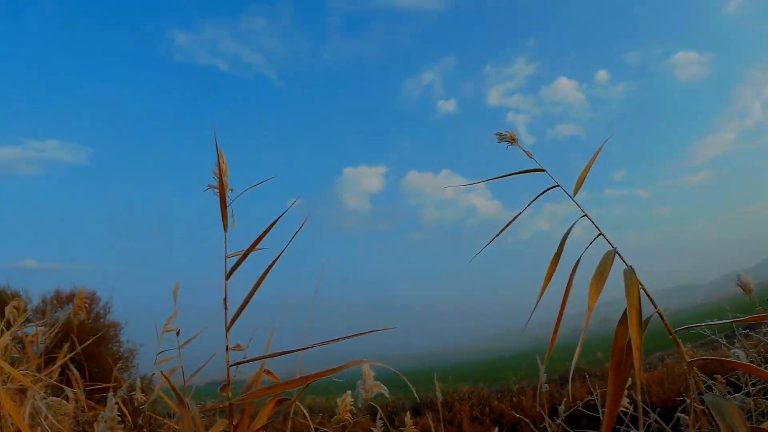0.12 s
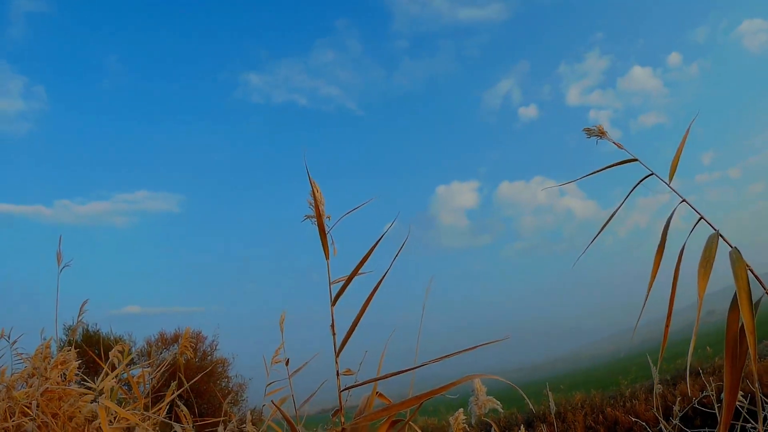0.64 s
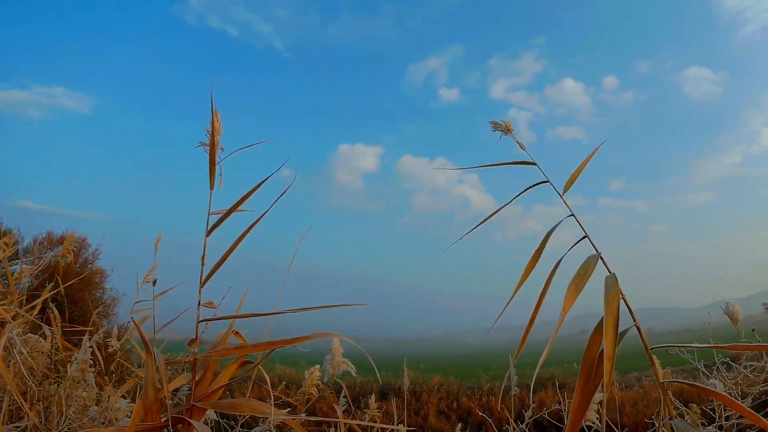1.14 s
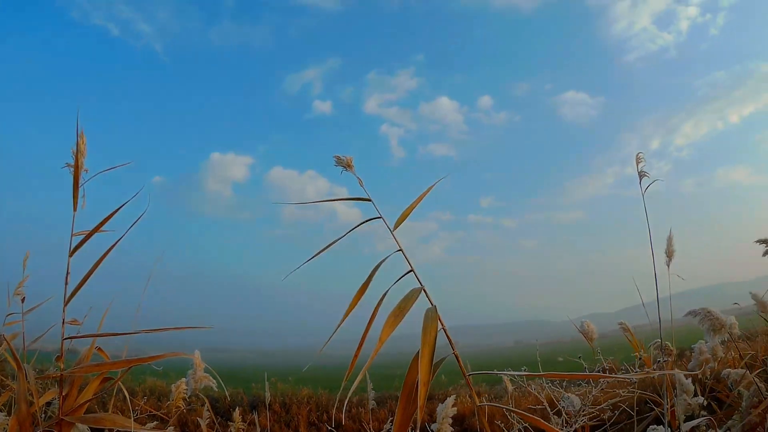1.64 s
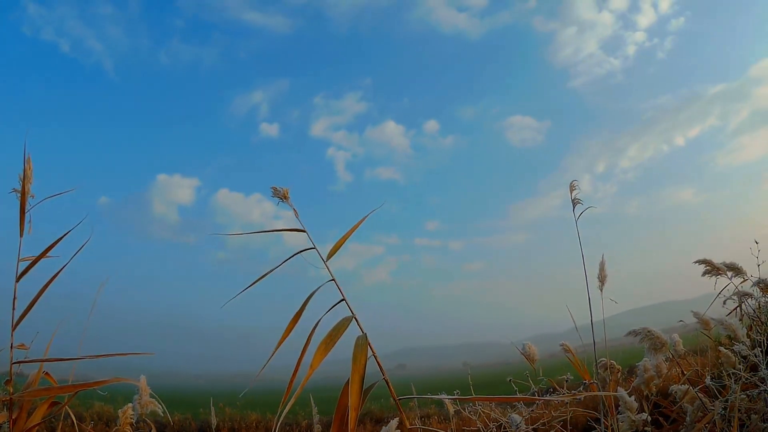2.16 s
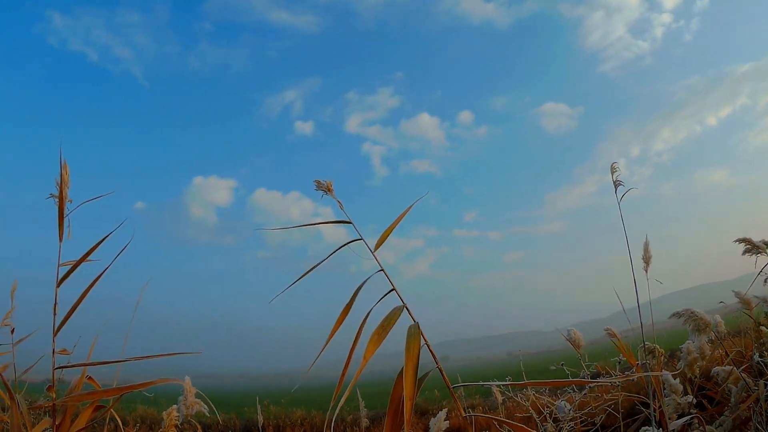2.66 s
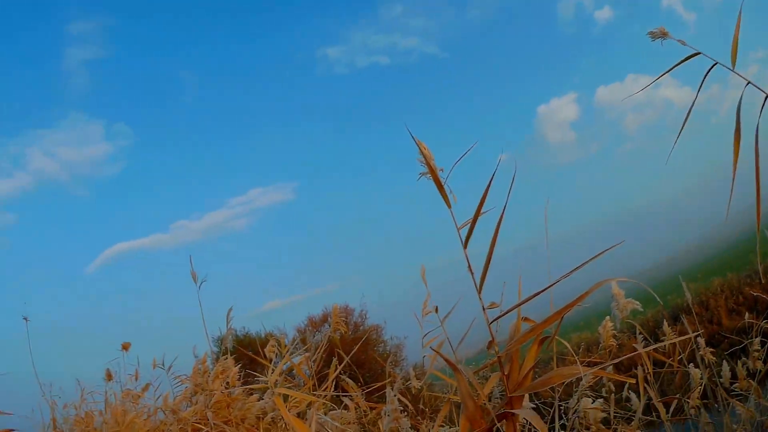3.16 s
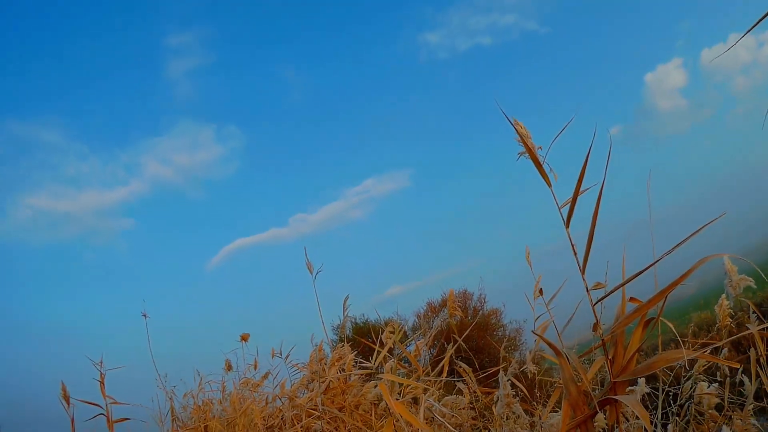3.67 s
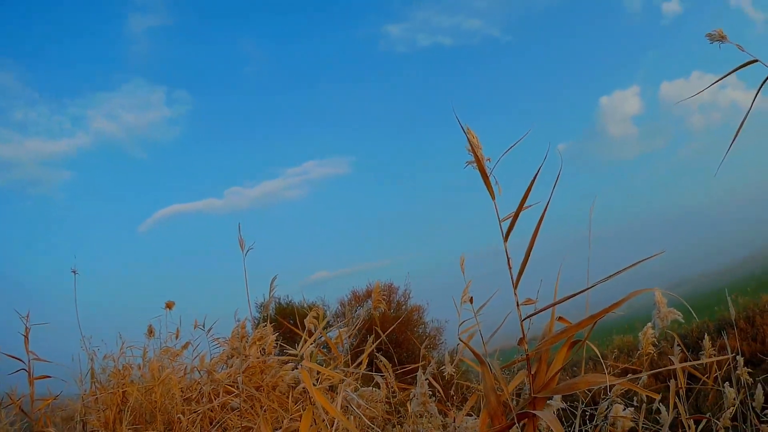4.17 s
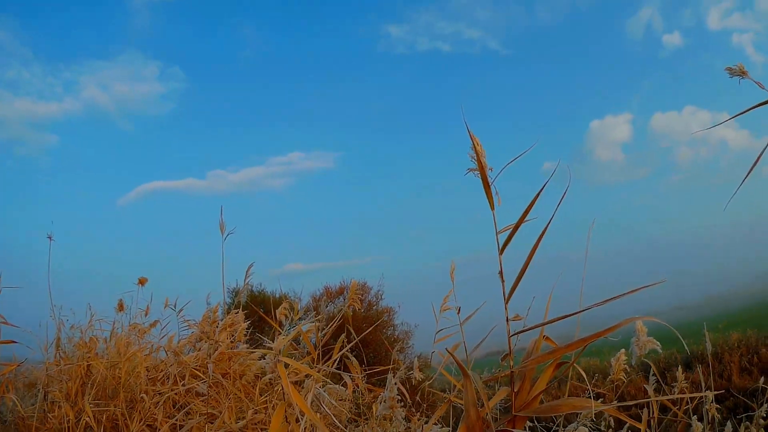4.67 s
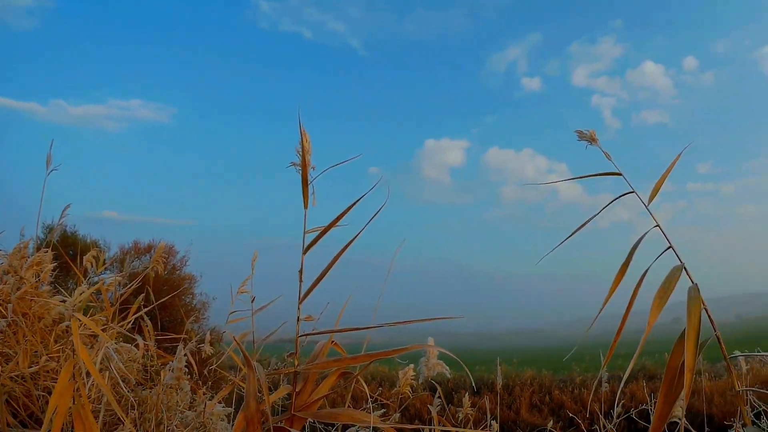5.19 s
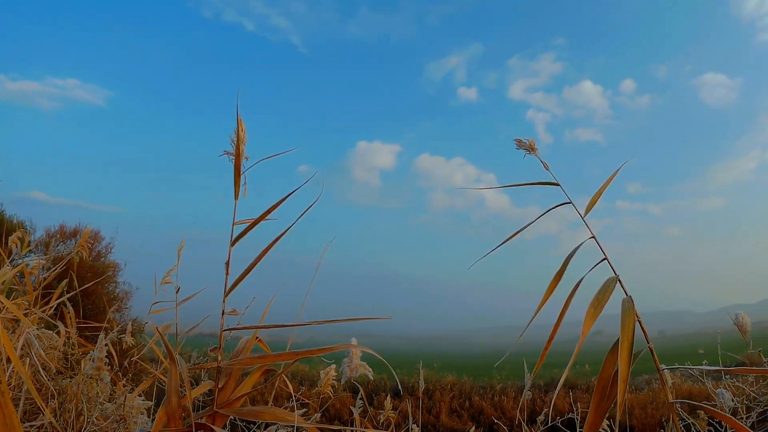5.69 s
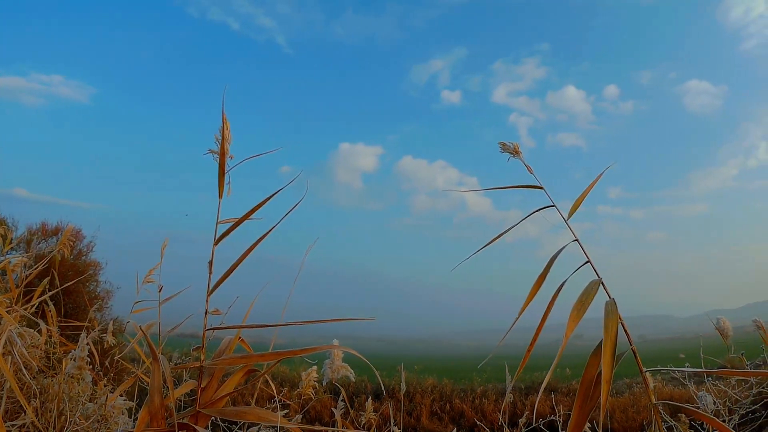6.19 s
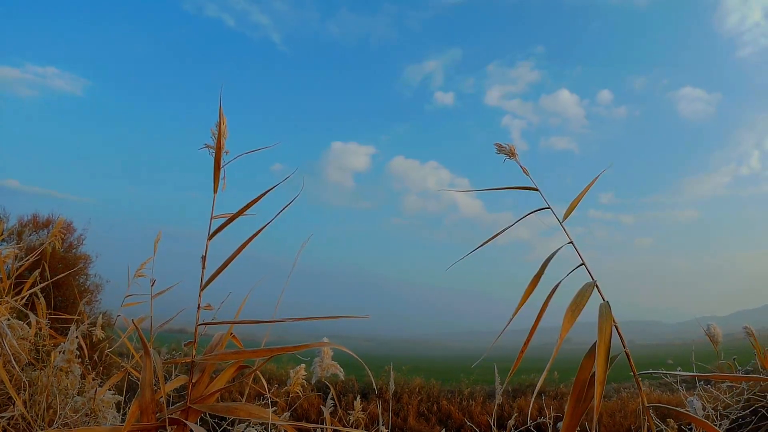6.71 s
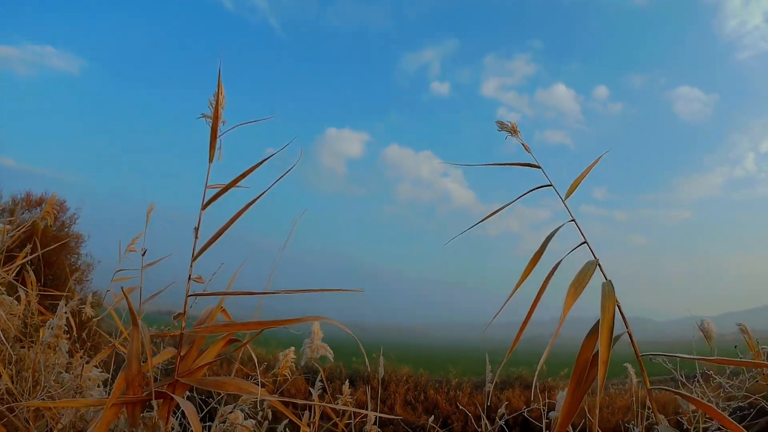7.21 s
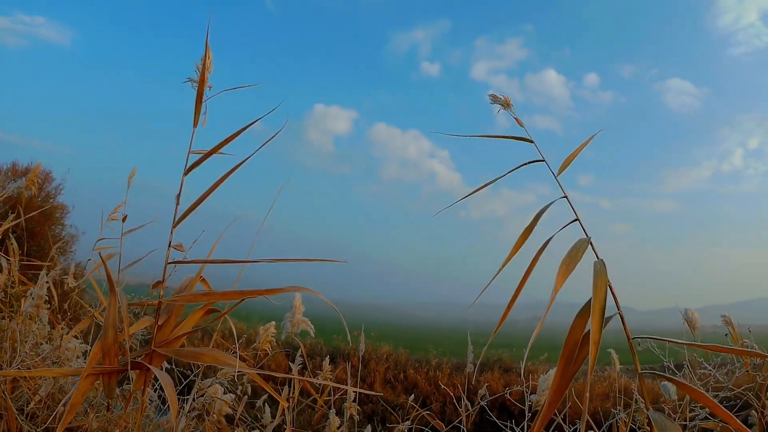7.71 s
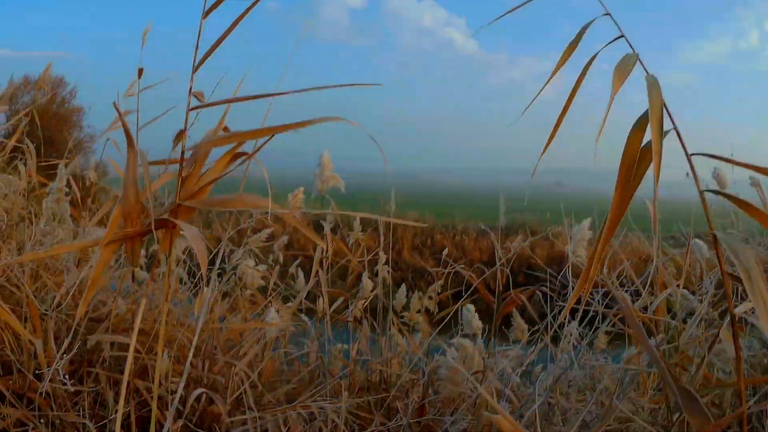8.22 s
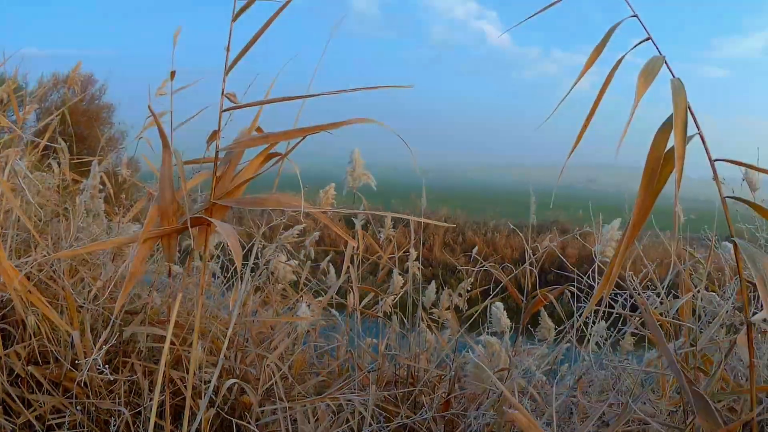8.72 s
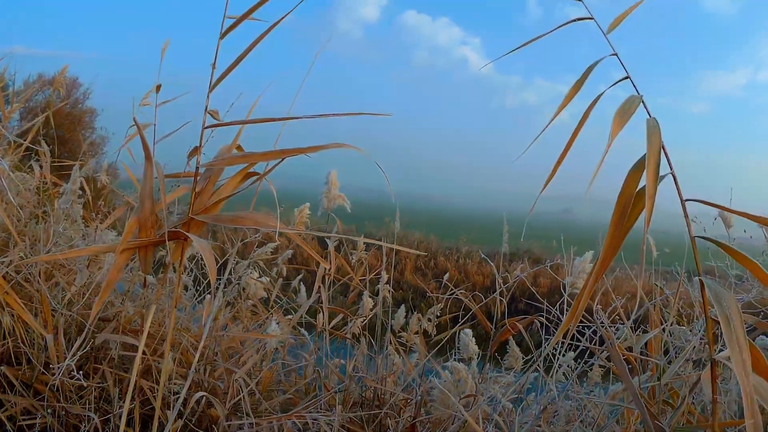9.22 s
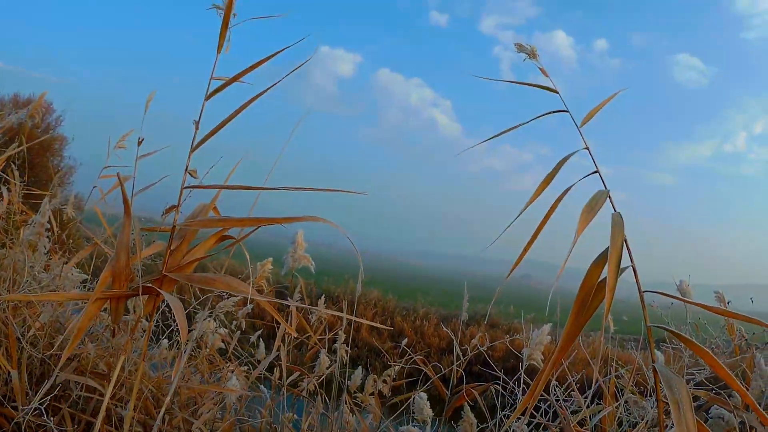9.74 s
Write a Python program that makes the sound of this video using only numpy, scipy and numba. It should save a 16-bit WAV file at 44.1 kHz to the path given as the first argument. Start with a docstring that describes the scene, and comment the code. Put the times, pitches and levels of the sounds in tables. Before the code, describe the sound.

Quiet country hiss and a thin high electronic whine lie under a loud duck call blown at close range. Buzzing, quack-like notes start long and even, then shorten and come faster with a rougher rasp. Later the reed stutters in quick muffled bursts, growls once from low to higher, and chatters again at the end. Faint handling knocks tick beside the small camera, which squashes the loudest notes. Open air, little reverberation.

```python
"""A reed duck call blown close to a small camera in an open field: a clipped opener, a run of
quacks that shorten, tongued chatter, one low growl and more chatter. Each slap of the reed is a
click that rings the barrel and the cupped hand. Small knocks and ticks sound near the camera, over
quiet country hiss and a thin whine. Loud notes overload the camera, whose gain ducks and recovers."""
import sys
import numpy as np
from scipy import signal
from scipy.fft import rfft, irfft
from scipy.io import wavfile
from scipy.ndimage import uniform_filter1d
from numba import njit

SR = 44100
rng = np.random.default_rng(int(sys.argv[2]) if len(sys.argv) > 2 else 0)


def voltage_ratio(level):
    """Linear amplitude factor for a level in decibels (scalar or array-like)."""
    return 10 ** (np.asarray(level, float) / 20)


def wav_record(signal):
    """Record a signal, one row per channel, as 16-bit PCM in the file named by sys.argv[1]."""
    frames = np.transpose(np.atleast_2d(signal))
    bounded = np.clip(frames, -1, 1)
    # unit amplitude maps onto the largest positive 16-bit level
    quanta = np.round(bounded * 32767).astype(np.int16)
    wavfile.write(sys.argv[1], SR, quanta)


N = 434826


def quacks():
    """Opener, quacks and growl: each slap of the reed is a click that rings the barrel and hand."""
    # The quacks of the run. Each row: start in seconds, length in seconds, reed rate in Hz as the
    # hold begins, relative level in dB then, roughness from 0 to 1.
    quack_rows = [(1.339, .36, 374, 5, .06), (1.905, .311, 371.5, 5.5, 0.06),
                  (2.421, 0.22, 363.9, 5.5, 0.06), (2.862, 0.18, 372.8, 6, 0.04),
                  (3.226, 0.17, 353.8, 7, .16), (3.579, 0.16, 295, 6.5, 0.19),
                  (3.917, 0.14, 301, 4.5, 0.19), (4.253, .12, 257.3, 5.5, 0.2)]
    # Two notes with their own shape, the clipped opener and the low growl. Each row: time in seconds,
    # reed rate in Hz, relative level in dB, roughness from 0 to 1, relative hand ring in dB.
    opener = [(1.13, 163, 4.5, 0.11, -15.5), (1.141, 192.6, 8, 0.07, -8.5), (1.152, 206, -3, 0.11, -8.5),
              (1.163, 202, -7.5, 0.05, -4)]
    growl_rows = [(7.495, 114.7, -34, .01, 10.5), (7.536, 129.5, -14.5, 0.013, 5.5),
                  (7.579, 152.2, -4, 0.01, -3), (7.624, 162.9, -2, 0.0046, -0.5),
                  (7.662, 165.9, 6, .012, -2.5), (7.68, 195.2, 0, 0.13, 4), (7.7, 233.6, 0, .08, -9.5),
                  (7.711, 228, -7, .05, 5)]

    barrel_hz, wander_hz, wander_s = 1590, 45, 0.01
    barrel_hz_per_roughness = 599.6
    step = int(wander_s * SR)
    wander = np.repeat(rng.standard_normal(N // step + 1), step)
    barrel_hz = barrel_hz + wander_hz * uniform_filter1d(wander, step)[:N]

    slaps, hand_db, keep = np.zeros(N), np.zeros(N), np.ones(N)
    for rows in [opener, growl_rows] + [quack_curve(*row) for row in quack_rows]:
        s, hz, db, roughness, ring_db = np.transpose(rows)
        start = int(s[0] * SR)
        t = np.arange(s[0], s[-1], 1 / SR)
        # the note and a short tail after it
        span = np.arange(start, start + len(t) + 2000)
        barrel_hz[span] += barrel_hz_per_roughness * roughness.max()
        at, beat, rate, rough = slap_times(t, s, hz, roughness, barrel_hz[start:][:len(t)])
        level_db = np.interp(at, s, db) + 2 * rough * rng.standard_normal(len(beat))
        # a faster reed slaps more softly
        size = voltage_ratio(level_db) / np.sqrt(rate / 380)
        # the first beats barely shut the reed
        add_clicks(slaps, at, 0.5 * size * voltage_ratio(-6 * 0.39 ** beat))
        # the reed swings wide open just before it shuts and lets the ring out
        keep[(at * SR).astype(int)[:, None] - np.arange(14, 34)] = 0.93
        hand_db[span] = np.interp(span / SR, s, ring_db)

    drive = with_air(slaps, air_db=-27)
    growl = np.arange(N) > 7 * SR  # from 7 s on, this function plays only the growl
    barrel = ring(pushed(drive, share=1.0), barrel_hz, 260.0, keep)
    out = -open_hand(pushed(drive, share=0.23), growl, hand_db) - barrel
    # a side cavity of the open hand swallows part of one band
    dip_hz, dip_width_hz, dip_depth = 2840, 340, 0.52
    dip = signal.lfilter(*signal.iirpeak(dip_hz, dip_hz / dip_width_hz, fs=SR), out)
    # the open hand radiates little bass
    thin = signal.sosfilt(signal.butter(2, 330, "high", fs=SR, output="sos"), out)
    return np.where(growl, out - growl_chamber(drive * growl), thin - dip_depth * dip)


def quack_curve(s, length_s, hz, db, rough):
    """A quack starts as all do, creeps up while held, then drops quickly in pitch and level."""
    # The shared start. Each row: seconds after the start, reed rate in Hz, level in dB relative to
    # the hold, roughness from 0 to 1, relative hand ring in dB.
    onset = [(0, 142.3, -21.5, 0.1, 3), (.02, 204.5, -6.5, .07, 0), (.055, 270, 2, .05, -6.5)]
    held_after_s, swell_db, creep = 0.09, 2.5, 0.024  # creep is a share of the rate
    release_s, release_db, release_sag = 0.018, -15.5, 0.46  # sag is a share of the rate
    # a rougher reed rings the hand more
    hand_db = -9.5 + 61.5 * rough
    end = s + length_s
    start_rows = [(s + t, f, db + under_db, r, ring_db) for t, f, under_db, r, ring_db in onset]
    return start_rows + [
        (s + held_after_s, hz, db, rough, hand_db),
        (end - release_s, hz * (1 + creep), db + swell_db, rough, hand_db),
        (end, hz * (1 - release_sag), db + release_db, rough, 4)]


def slap_times(t, s, hz, roughness, barrel_hz):
    """Reed beats follow the rate curve; a rough reed limps, jitters and locks to the barrel: a rasp."""
    phase = np.cumsum(np.interp(t, s, hz)) / SR
    beat = np.arange(int(phase[-1]) + 1)
    jitter, choice = rng.standard_normal((2, len(beat)))
    at = np.interp(beat, phase, t)
    rate, rough = np.interp(at, s, hz), np.interp(at, s, roughness)
    # past this roughness the beats pair up long-short
    limp_from = 0.065
    at = at + 0.7 * np.maximum(rough - limp_from, 0) * (-1.0) ** beat / rate
    # a hard-blown reed shuts in step with the barrel's ring: gaps of four or five rings limp
    rings = np.cumsum(barrel_hz) / SR
    chosen = np.interp(at, t, rings) + 3.2 * np.minimum(rough, limp_from) * choice
    in_step = np.interp(np.round(chosen), rings, t)
    pull = np.clip(18 * rough - 0.15, 0, 0.75)
    at = at + pull * (in_step - at)
    at = at + np.minimum(rough, 1.62 * limp_from) * 0.36 * jitter / rate
    return at, beat, rate, rough


def open_hand(drive, growl, hand_db):
    """The open hand rings at fixed pitches; it is tighter for the growl, so upper rings rise."""
    # What a slap rings in the hand. Each row: pitch in Hz outside the growl, width in Hz,
    # level in dB before the note's own hand ring is added.
    hand_rings = [(413, 46, -23), (530, 170, -9), (760, 310, -37), (1074, 193, -6), (1380, 1470, 9.5),
                  (2100, 120, -18), (2460, 81, -21), (3280, 300, -4.5), (3820, 122, -23),
                  (5030, 180, -34.5), (5240, 750, -29), (6750, 400, -34), (7000, 150, -28),
                  (8200, 900, -43), (9540, 300, -64.5), (13100, 2300, -36.5)]
    low_rings_hz, upper_hz, growl_rise = 600, 3000, 1.21
    out = np.zeros(N)
    for hz, width, db in hand_rings:
        growl_hz = min(hz * growl_rise, 15000) if hz > upper_hz else hz
        rung = mode(drive * ~growl, hz, width) + mode(drive * growl, growl_hz, width)
        # low rings do not follow the note's hand level
        out += voltage_ratio(db + hand_db * (hz > low_rings_hz)) * rung
    return out


def growl_chamber(drive):
    """The tight hand of the growl also closes a low chamber, which rings at one pitch."""
    # The chamber's single row: pitch in Hz, width in Hz, level in dB.
    chamber = (147, 70, -7.5)
    return voltage_ratio(chamber[2]) * mode(drive, *chamber[:2])


def pushed(drive, share):
    """The closing reed pushes air out a third of a millisecond before the suction of the slap."""
    return drive - share * np.roll(drive, -SR // 3200)


def with_air(slaps, air_db):
    """Each slap is followed by a short puff of turbulent air."""
    puff_s = 0.0015
    puff = signal.lfilter([1], [1, -np.exp(-1 / (puff_s * SR))], slaps)
    high_pass = signal.butter(2, 2200, "high", fs=SR, output="sos")
    hiss = signal.sosfilt(high_pass, rng.standard_normal(N))
    return slaps + voltage_ratio(air_db) * puff * hiss


def add_clicks(x, seconds, sizes):
    """Adds clicks, each shared between two samples so that it can fall between them."""
    at = np.clip(seconds * SR, 0, N - 2)
    whole = at.astype(int)
    np.add.at(x, whole, sizes * (1 - at + whole))
    np.add.at(x, whole + 1, sizes * (at - whole))


@njit
def ring(x, hz, width_hz, keep):
    """One decaying ring whose pitch may move; keep under 1 chokes what still rings."""
    y, z = np.empty(len(x)), 0j
    for i in range(len(x)):
        z = z * keep[i] * np.exp((2j * hz[i] - width_hz) * np.pi / SR) + x[i]
        y[i] = z.imag
    return y


def mode(x, hz, width_hz):
    """One decaying ring of fixed pitch; a larger width dies away faster."""
    return signal.lfilter([1], [1, -np.exp((2j * hz - width_hz) * np.pi / SR)], x).imag


def chatter():
    """The reed flutters fast and grows, then slaps shut, mostly at about half the rate."""
    # The chatter notes. Each row: first full slap in seconds, number of slaps, slap rate in Hz,
    # relative peak in dB, flutter growth in dB, about so much a beat.
    notes = [(5.5116, 2, 121.3, -14.5, 5.5), (5.6071, 2, 137, -8, 5.5), (5.6859, 6, 149.7, -2, 7),
             (5.7738, 1, 182, -12.5, 2), (5.8431, 2, 163.5, -2.5, 5), (5.9178, 2, 174, -1, 5.5),
             (5.9928, 6, 183.8, -0.5, 6), (6.0728, 2, 162, -5, 4), (6.1408, 4, 177.4, .5, 5.5),
             (6.2214, 2, 183.8, -2.5, 4), (6.2936, 4, 167.6, 1, 8.5), (6.3771, 4, 176.3, 0.5, 7.5),
             (6.455, 3, 177.6, -1.5, 5.5), (6.5287, 3, 177.4, -0.5, 6), (6.6097, 4, 187, 0.5, 5),
             (6.6917, 1, 182, -4, 4), (6.7667, 6, 189.5, 1, 7), (6.854, 2, 200.6, 1, 7),
             (6.932, 6, 194.1, 2, 6), (7.0082, 2, 300, -20, 0.5), (7.1008, 2, 190, -8, 3),
             (9.3695, 4, 125.4, 0.5, 23), (9.4506, 6, 147.3, 2.5, 9.5), (9.6493, 4, 156.4, 3.5, 21),
             (9.7356, 5, 164.8, 4.5, 8.5), (9.8478, 3, 166.4, 4.5, 11.5)]
    flutter_hz, long_slaps = 340, 4
    slaps, flutter, note = np.zeros(N), np.zeros(N), np.zeros(N, int)
    before = np.arange(1, 6)  # flutter beats, counted back from the first slap
    for k, (s, count, slap_hz, peak_db, growth_db) in enumerate(notes):
        beat = np.arange(round(count))
        is_long = count >= long_slaps
        # long notes start under the peak and run out of air at the end
        fade_db = (-16 if is_long else -1) * (beat / max(beat[-1], 1)) ** 4
        fade_db[0] = -3.5 * is_long
        late, louder = rng.standard_normal((2, len(beat)))
        at = s + (beat + 0.042 * late * (beat > 0)) / slap_hz
        add_clicks(slaps, at, voltage_ratio(peak_db + fade_db + 1.4 * louder))
        flutter_at = s - (before + 0.21) / flutter_hz
        add_clicks(flutter, flutter_at, voltage_ratio(peak_db - growth_db * before ** 0.9))
        note[int((s - 0.03) * SR):] = k
    # flutter beats do not shut the reed, so they are softer pulses
    slaps = pushed(uniform_filter1d(slaps, size=3), share=0.7)
    flutter = uniform_filter1d(flutter, size=9)
    drive = with_air(0.19 * slaps + 0.21 * flutter, air_db=-10)
    add_tongue_puffs(drive)
    # the closed hand dulls the top
    drive = signal.sosfilt(signal.butter(2, 8500, fs=SR, output="sos"), drive)
    return -closed_hand(drive, note, len(notes))


def add_tongue_puffs(drive):
    """A puff of air as the tongue lets go before some notes: a short swell of noise."""
    # Each row: time of the puff in seconds, relative level in dB.
    puffs = [(1.125, -7), (5.892, -18), (6.198, -15), (6.353, -18), (6.508, -23), (6.669, -15),
             (6.833, -17), (7.076, -26)]
    t = np.arange(800) / SR
    for s, db in puffs:
        swell = t * np.exp(-t / 0.0014)
        drive[int(s * SR) - 60:][:800] += 40 * voltage_ratio(db) * swell * rng.standard_normal(800)


def closed_hand(drive, note, note_count):
    """The closed hand rings; it sits a little differently on every note, which moves upper rings."""
    # What a slap rings in the hand. Each row: middle pitch in Hz, least width in Hz,
    # level in dB before the treble curve and the scatter from note to note.
    hand_rings = [(387, 119, 3.5), (772, 146, 4), (1053, 460, 9.5), (1512, 330, 11.5), (2239, 73, -11.5),
                  (3340, 273, -4.5), (3980, 260, 0), (5100, 550, -11.5), (5900, 530, -2), (6950, 470, -24)]
    # How the treble level moves. Each row: time in seconds, change in dB.
    treble_curve = [(5.5, 0.5), (5.7, -10), (6.4, -4.5), (6.95, -6.5), (7.05, -2), (9.3, -3), (9.86, 3.5)]
    scatter_db, pitch_scatter = 2.5, 0.05  # pitch scatter is a share of the pitch
    sharpest = 10.5  # highest ratio of pitch to width in a soft palm
    treble_db = np.interp(np.arange(N) / SR, *np.transpose(treble_curve))
    out = np.zeros(N)
    for hz, width, db in hand_rings:
        tint, move = rng.standard_normal((2, note_count))[:, note] * (hz > 1800)
        ring_hz = hz * (1 + pitch_scatter * move)
        level = voltage_ratio(db + treble_db * (hz > 2800) + scatter_db * tint)
        out += level * ring(drive, ring_hz, max(width, hz / sharpest), np.ones(N))
    return out


def ticks():
    """Small knocks near the camera: a short crack of noise that rings one damped mode."""
    # Each row: time in seconds, peak in dB, pitch in Hz, seconds for the ring to fall by 60 dB.
    knocks = [(0.161, -35, 1150, 0.022), (4.523, -35.5, 824, 0.024), (7.295, -34.5, 1280, 0.028),
              (7.857, -26.5, 980, 0.026), (7.909, -28, 1290, 0.039), (8.048, -36, 1030, 0.022),
              (8.761, -21.5, 3340, 0.011), (8.767, -33, 1860, 0.04), (8.791, -21, 1300, 0.01),
              (9.233, -37, 5540, 0.008)]
    out, t = np.zeros(N), np.arange(2000) / SR
    for s, db, hz, t60 in knocks:
        crack = rng.standard_normal(2000) * np.exp(-t / 0.0041)
        width_hz = np.log(1000) / np.pi / max(t60, 0.003)
        knock = mode(crack, hz, width_hz) + 3 * uniform_filter1d(crack, size=4)
        out[int(s * SR):][:2000] += voltage_ratio(db) * knock / np.abs(knock).max()
    return out


def field():
    """Distant country hiss and far rumble: shaped noise that swells a little, plus a high whine."""
    # The colour of the hiss. Each row: frequency in Hz, relative level in dB per Hz.
    hiss_colour = [(12, -25.5), (20, 1), (59, -3), (267, -2.5), (307, -1.5), (405, -2.5), (479, -2.5),
                   (708, -4.5), (1630, -9.5), (1770, -12), (6050, -20), (13200, -24.5), (15600, -26)]
    # The camera's electronics, steady tones. Each row: pitch in Hz, average (rms) level in dB.
    whine = [(12780, -61), (12828, -83), (12877, -67.5)]
    hiss_db, swell_db = -46, 0.8
    hz, db = np.transpose(hiss_colour)
    f = np.arange(N // 2 + 1) * SR / N
    colour = voltage_ratio(np.interp(np.log(f + 1), np.log(hz), db))
    hiss = irfft(rfft(rng.standard_normal(N)) * colour, N)
    swell = np.repeat(rng.standard_normal(N // 6000 + 1), 6000)
    swell = uniform_filter1d(swell, size=6000)[:N]
    out = hiss * voltage_ratio(hiss_db + swell_db * swell) / hiss.std()
    t = np.arange(N) / SR
    for hz, db in whine:
        out += np.sqrt(2) * voltage_ratio(db) * np.sin(2 * np.pi * (hz * t + rng.random()))
    return out


def scene():
    """The call, a short scatter from the reeds and ground around it, the ticks and the field."""
    band = signal.butter(2, [240, 11000], "band", fs=SR, output="sos")
    call = signal.sosfilt(band, quacks() + chatter())
    t = np.arange(4000) / SR
    # dense echoes that start after 2 ms and fall by 60 dB in 0.1 s
    echoes = rng.standard_normal(4000) * np.exp(-np.log(1000) * t / 0.1) * (t > 0.002)
    scatter = voltage_ratio(-49.5) * signal.fftconvolve(call, echoes)[:N]
    return (call + scatter + ticks() + field())[None]


@njit
def duck_gain(level_db, knee_db, slope, attack_s, hold_s, release_s):
    """The gain sinks while the sound is over the knee, waits, then recovers; returns dB."""
    out, db, wait = np.empty(len(level_db)), 0., 0.
    for i in range(len(level_db)):
        want = min(0., (knee_db - level_db[i]) * slope)
        if want < db:
            db, wait = db + (want - db) / (attack_s * SR), hold_s * SR
        elif wait > 0:
            wait -= 1
        else:
            db += (want - db) / (release_s * SR)
        out[i] = db
    return out


def roll_off(x):
    """The treble ends steeply here."""
    return signal.sosfilt(signal.butter(12, 15740, fs=SR, output="sos"), x)


def record(dry):
    """The camera: gain control, soft overload, then a capacitor that blocks the slowest swings."""
    level_db = 10 * np.log10(uniform_filter1d(dry[0] ** 2, size=800) + 1e-12)
    gain_db = duck_gain(level_db, -9.5, 0.9, attack_s=0.072, hold_s=0.11, release_s=0.02)
    x = dry * voltage_ratio(gain_db)
    # part of the ducking acts after the overload and lowers its ceiling
    ceiling = 0.72 * voltage_ratio(0.15 * gain_db)
    x = x / (1 + np.abs(x / ceiling) ** 5) ** (1 / 5)
    x = signal.sosfilt(signal.butter(1, 3.5, "high", fs=SR, output="sos"), x)
    return roll_off(x)


dry = scene()
out = record(dry)
wav_record(out)
```